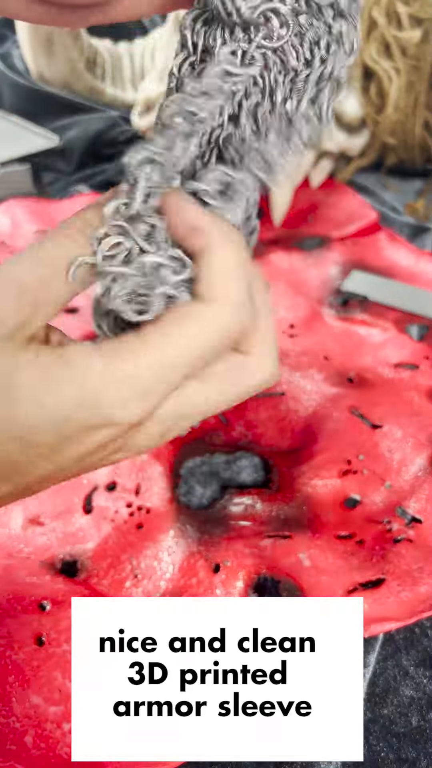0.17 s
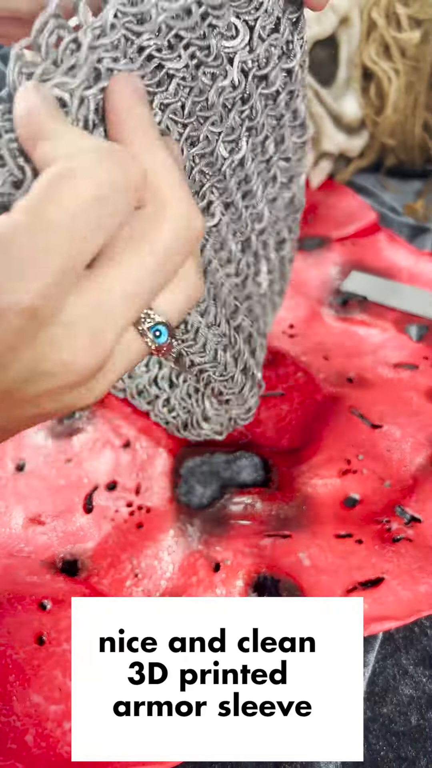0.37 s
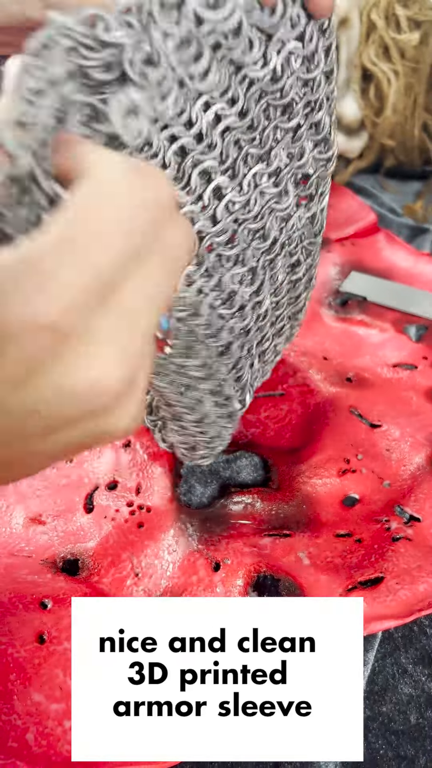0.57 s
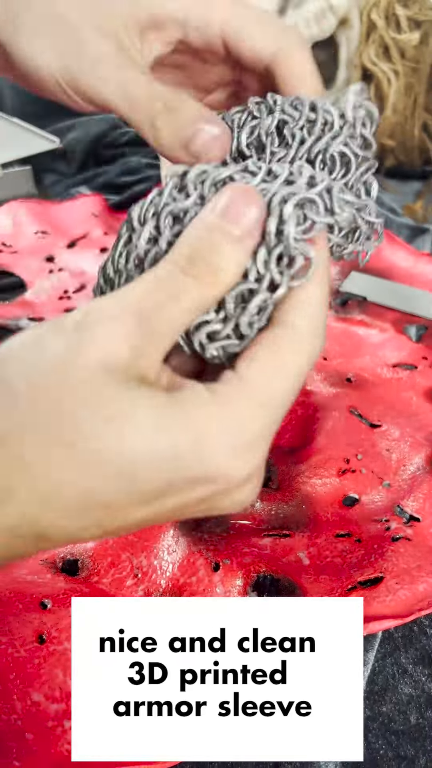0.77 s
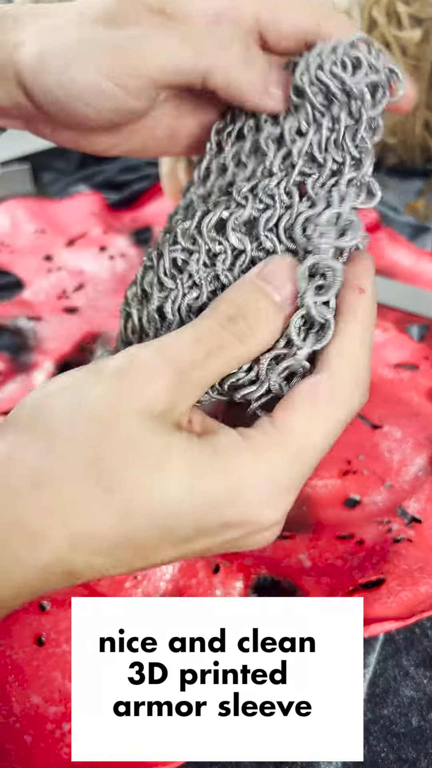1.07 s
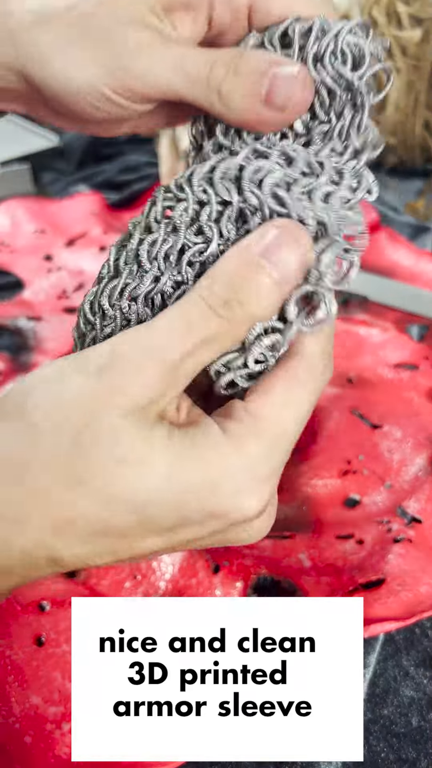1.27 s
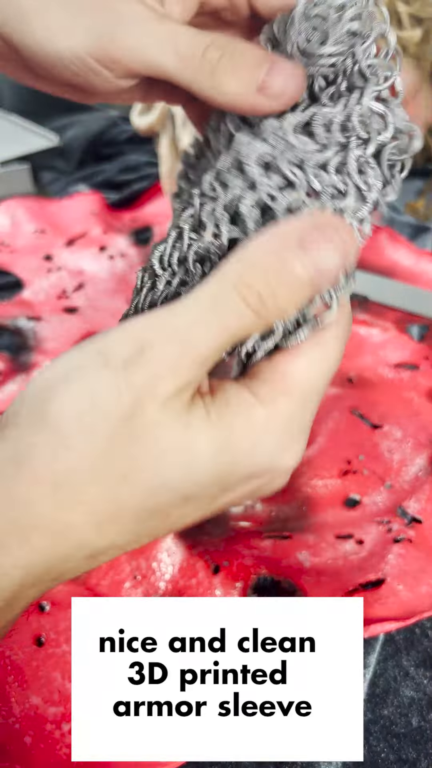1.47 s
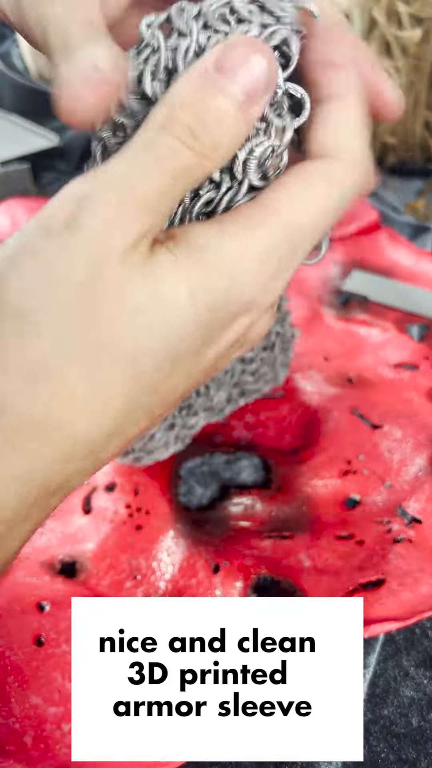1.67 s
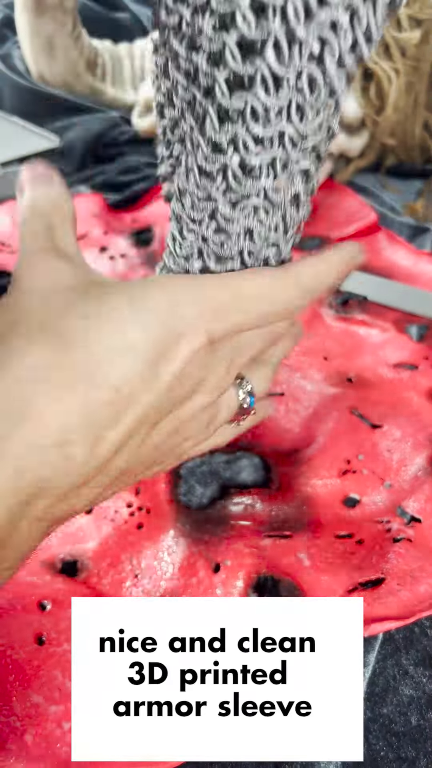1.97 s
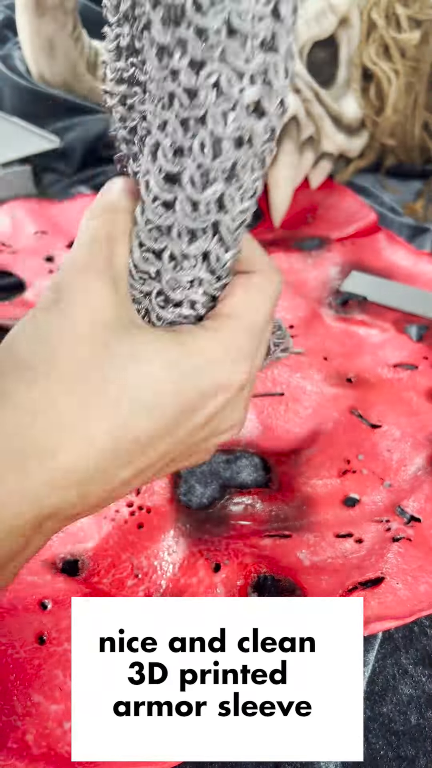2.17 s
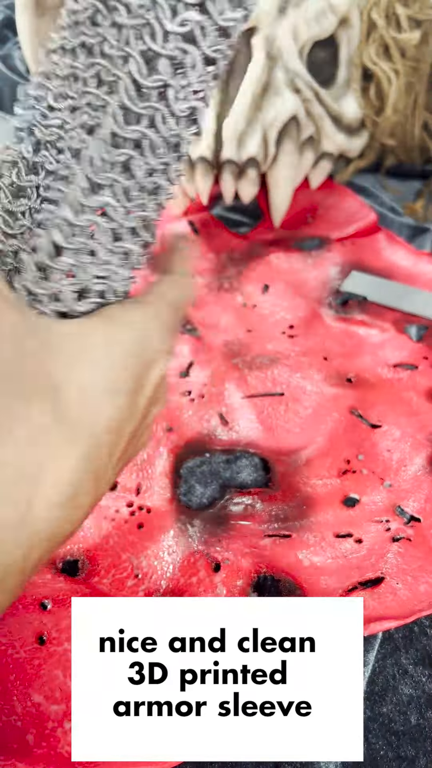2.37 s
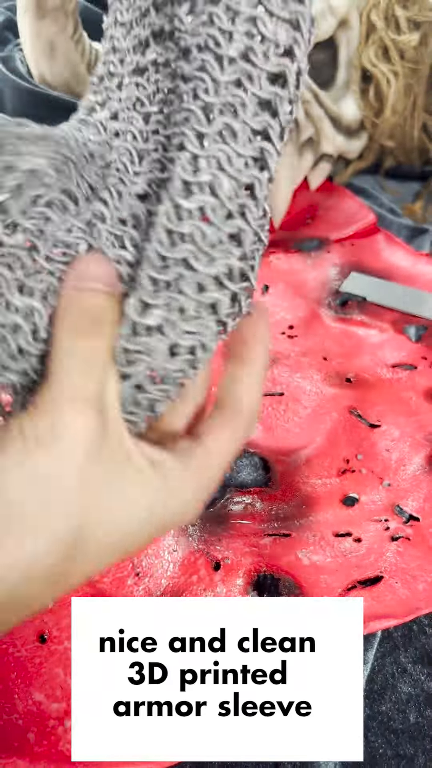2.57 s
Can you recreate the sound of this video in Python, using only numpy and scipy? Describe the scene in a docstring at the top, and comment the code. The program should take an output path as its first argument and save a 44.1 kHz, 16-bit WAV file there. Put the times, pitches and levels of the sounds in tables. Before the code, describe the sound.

A chainmail sleeve of hard plastic links is handled close to the microphone in a small room: bright dense rustling, lower hollow clatter, dry snaps, the sharpest midway, then two crunches, over faint hum.

```python
"""A sleeve of hard plastic chain links is squeezed and turned by hand, close up in a small room.
From the start, still air and a machine's hum (filtered noise and wavering sines) lie under a bright rustle
of tiny ringing contacts, while bunches of links clatter lower down and ring short hollow knocks.
Loose links soon snap as dry noise bursts; fistfuls are crushed at about 0.5 and 0.8 s, the hardest snap
comes near 1.26 s, and two closer crunches follow just after 2 s."""
import sys
import numpy as np
from scipy import signal
from scipy.fft import rfft, irfft
from scipy.io import wavfile
from scipy.ndimage import uniform_filter1d

SR = 44100
rng = np.random.default_rng(int(sys.argv[2]) if len(sys.argv) > 2 else 0)


def store_pcm(level_fs):
    """Save levels as 16-bit WAV."""
    pcm = np.round(np.clip(level_fs, -1, 1) * 32767).astype(np.int16)
    wavfile.write(sys.argv[1], SR, np.atleast_2d(pcm).T)


def gain_from_db(level_db):
    """Convert decibel levels to linear amplitude factors (20 dB per decade)."""
    decades = np.asarray(level_db, float) / 20
    return 10 ** decades


N = 119952  # 2.72 s


def evened(x):
    """Scales to rms 1."""
    return x / np.sqrt(np.mean(x ** 2) + 1e-20)


def read(points, at, axis=1):
    """Reads one table column along straight lines between its points."""
    table = np.array(points, float)
    return np.interp(at, table[:, 0], table[:, axis])


def coloured(x, points):
    """Filters by a spectrum whose points are joined on a log-frequency axis."""
    hz, db = np.transpose(points)
    log_hz = np.log(np.fft.rfftfreq(N, 1 / SR) + 1)
    return irfft(rfft(x) * gain_from_db(np.interp(log_hz, np.log(hz), db)), N)


def low_part(x, split_hz):
    """The part of a sound below a split, without phase shift."""
    return signal.sosfiltfilt(signal.butter(2, split_hz, fs=SR, output="sos"), x)


def wander(per_s):
    """Slow random drift of rms 1: noise averaged twice over 1/per_s seconds."""
    size = max(int(SR / per_s), 2)
    smooth = uniform_filter1d(rng.standard_normal(N), size)
    return evened(uniform_filter1d(smooth, size))


def add(mix, s, sound):
    """Places a sound at a time."""
    part = mix[round(s * SR):][:len(sound)]
    part += sound[:len(part)]


# colour of the still room air: (f/Hz, relative level/dB)
AIR_COLOUR = [(20, -35), (32, -37), (48, 2.5), (85, -3), (125, -2), (165, -4.5), (225, -1), (330, -6.5),
              (500, -9.5), (900, -17.5), (1400, -25), (2300, -25.5), (4500, -15.5), (7000, -20.5),
              (10000, -13.5), (16000, -31.5)]


def room_air():
    """Still air as steady noise, heaviest in the lows."""
    return gain_from_db(-48) * evened(coloured(rng.standard_normal(N), AIR_COLOUR))


# steady tones of the machine, before the port balance: (f/Hz, level/dB rms, waver/dB rms)
HUM_TONES = [(99.5, -55, 0.5), (120.2, -50, 0.56), (296.7, -66, 1), (383.5, -69, 4)]
# one hum tone that swells, fades and drifts, before the port balance: (t/s, f/Hz, level/dB rms)
SWELLING_TONE = [(0.0, 191.7, -43), (0.07, 196.6, -60.5), (0.16, 193.5, -46), (0.34, 190.3, -51),
                 (0.75, 190.7, -45.5), (1.02, 190.9, -56), (1.52, 190.6, -50.5), (1.53, 189.9, -47.5),
                 (2.33, 191.3, -56.5), (2.39, 190.4, -48.5), (2.45, 189.7, -68), (2.46, 190.3, -58),
                 (2.48, 190.6, -50), (2.72, 193, -50)]


def hum():
    """Machine hum: sines of wavering level, plus one whose pitch and level follow a table."""
    t = np.arange(N) / SR
    phase = 2 * np.pi * np.cumsum(read(SWELLING_TONE, t)) / SR
    out = np.sqrt(2) * gain_from_db(read(SWELLING_TONE, t, axis=2)) * np.sin(phase)
    for hz, db, waver_db in HUM_TONES:
        level = np.sqrt(2) * gain_from_db(db + waver_db * wander(9.1))
        out += level * np.sin(2 * np.pi * (hz * t + rng.random()))
    return out


# how alike the two microphone ports hear: (f/Hz, likeness/0-1, lead of the right port/rad)
PORT_LIKENESS = [(30, 1, 0), (70, .99, 0), (140, .85, 0), (250, .9, .1), (400, .5, .4), (600, .3, 2.5),
                 (850, .2, 0), (1200, .5, 0), (1650, .985, 0), (2150, .985, 0), (2500, .7, .4),
                 (3100, .2, .5), (3750, .96, .1), (4250, .96, .1), (4600, .7, .7), (4950, .93, 2.9),
                 (5150, .93, 3.5), (5450, .97, 6.1), (5700, .995, 6.28), (7200, .995, 6.3), (7500, .9, 6.8),
                 (8300, .9, 7.2), (9600, .92, 7.5), (11700, .93, 8.6), (13000, .97, 9.2),
                 (13500, .997, 9.42), (16000, .995, 9.45)]


def ports(x, other):
    """The right port hears part of the left sound, phase-turned, and part of a separate, similar sound."""
    hz = np.fft.rfftfreq(N, 1 / SR)
    same = np.clip(read(PORT_LIKENESS, hz), 0, 1)
    shared = same * np.exp(1j * read(PORT_LIKENESS, hz, axis=2)) * rfft(x)
    separate = np.sqrt(1 - same ** 2) * rfft(other)
    return np.array([x, irfft(shared + separate, N)])


def echoes(x, t60, start_s):
    """Room tail: a decaying noise spray of reflections, energy 1."""
    t = np.arange(SR // 4) / SR
    tail = rng.standard_normal(len(t)) * gain_from_db(-60 * t / t60) * (t >= start_s)
    return signal.oaconvolve(x, tail / np.linalg.norm(tail))[:N]


KNOCK_T60_S, KNOCK_TRIM_DB = .016, 1
# single hollow knocks of a bunch: (t/s, level/dB before trim, f/Hz of the ring)
KNOCKS = [(0.0357, -38, 2330), (0.5931, -39, 2330), (0.6464, -34, 2130), (0.9834, -33.5, 2260),
          (1.5222, -41, 2300), (1.7467, -34, 2620), (1.8835, -34, 2835), (1.9789, -29, 2520),
          (2.1164, -36, 2200)]


def knocks():
    """Each knock rings one short hollow note, a sine dying exponentially."""
    out, t = np.zeros(N), np.arange(1200) / SR
    for s, db, hz in KNOCKS:
        fade = gain_from_db(db + KNOCK_TRIM_DB - 60 * t / KNOCK_T60_S)
        add(out, s, fade * np.sin(2 * np.pi * hz * t))
    return out


SNAP_RISE_S, SNAP_FADE_S, SNAP_TRIM_DB, SNAP_SPLIT_HZ = .001, .0022, 4, 3400
# colour of a snap: (f/Hz, relative level/dB)
SNAP_COLOUR = [(1000, -14), (2000, -23), (3000, -20), (4200, -8), (5500, -11.5), (7600, -0.5), (9500, -10),
               (12000, 3.5), (15500, -3)]
# single links snapping past each other: (t/s, level/dB before trim, extra level/dB below the split)
SNAPS = [(0.0684, -31, -5), (0.294, -31, 9), (0.4694, -40, -2), (0.5195, -21, -4), (0.875, -23.5, 0),
         (1.1577, -24, -1), (1.259, -13, -1.5), (1.294, -21.5, 4.5), (1.3474, -22, 5), (1.3529, -30, 0),
         (1.3986, -35, -8), (1.6548, -36, -11), (1.942, -34, 3)]


def snaps():
    """Each snap is a dry noise burst of a few milliseconds, with its own share of dull and bright."""
    out, t = np.zeros(N), np.arange(800) / SR
    burst = evened(coloured(rng.standard_normal(N), SNAP_COLOUR))
    dull = low_part(burst, SNAP_SPLIT_HZ)
    envelope = (1 - np.exp(-(t / SNAP_RISE_S) ** 2)) * np.exp(-t / SNAP_FADE_S)
    for s, db, dull_db in SNAPS:
        body = (burst + (gain_from_db(dull_db) - 1) * dull)[round(s * SR):][:len(t)]
        add(out, s, gain_from_db(db + SNAP_TRIM_DB) * envelope * body)
    return out


def contacts(per_s, cycles, spread_db, clump_db, lo_hz, hi_hz, count=24):
    """Random contacts, each ringing a few cycles at one of many pitches, coming in clumps."""
    out, t = np.zeros(N), np.arange(400) / SR
    for hz in np.geomspace(lo_hz, hi_hz, count):
        strength_db = spread_db * np.minimum(rng.exponential(1, N), 5)
        hits = (rng.random(N) < per_s / count / SR) * gain_from_db(strength_db)
        signs = rng.choice([-1., 1.], N)
        ring = np.sin(2 * np.pi * hz * t) * np.exp(-t * hz / cycles * 2)
        ring *= hz / np.linalg.norm(ring)
        out += signal.oaconvolve(hits * signs, ring)[:N] / np.sqrt(hz)
    return out * gain_from_db(clump_db * (wander(113) + wander(20)))


CLATTER_TRIM_DB = 2
# colour of the bumping bunches: (f/Hz, relative level/dB)
BUNCH_COLOUR = [(400, -16.5), (900, -10.5), (1500, -7), (2400, -1.5), (3200, -3), (4500, -6.5),
                (7000, -11.5), (12000, -24)]
# how hard bunches of links bump: (t/s, level/dB before trim)
BUMP = [(0.0, -51), (0.03, -54), (0.04, -53), (0.07, -58.5), (0.26, -51), (0.39, -60.5), (0.45, -50),
        (0.57, -58.5), (0.6, -49.5), (0.76, -45.5), (0.79, -52), (0.95, -49.5), (0.98, -42), (1.04, -48.5),
        (1.37, -54), (1.38, -58.5), (1.48, -49.5), (1.49, -61), (1.52, -50), (1.65, -58), (1.74, -45.5),
        (1.8, -50.5), (1.97, -45), (1.98, -41.5), (1.99, -40), (2.12, -42.5), (2.14, -56), (2.34, -62),
        (2.58, -52), (2.72, -61)]


def clatter():
    """Bunches of links bumping: fewer contacts than the rustle, lower and hollower."""
    grains = contacts(4000, cycles=4.25, spread_db=2, clump_db=1.3, lo_hz=693, hi_hz=7150)
    bunches = evened(coloured(grains, BUNCH_COLOUR))
    return bunches * gain_from_db(CLATTER_TRIM_DB + read(BUMP, np.arange(N) / SR))


RUSTLE_TRIM_DB = 5.5
LET_GO_S, CRUSH_DULL, CRUSH_SPLIT_HZ = .004, 0.73, 8500  # crushing adds a share more dB below the split
# colour of the link contacts: (f/Hz, relative level/dB)
LINK_COLOUR = [(1500, -23.5), (2500, -18), (4000, -16), (5300, -10.5), (6500, -7.5), (7300, -7),
               (8300, -0.5), (9500, 1.5), (10400, -4), (11800, 1), (13500, -1), (15500, -5), (18000, -12.5)]
# how hard the links slide: (t/s, level/dB before trim and crush)
SLIDE = sum([ [(0.0, -34), (0.054, -40.5), (0.188, -36.5), (0.338, -45), (0.376, -44.5), (0.386, -49),
         (0.504, -51.5), (0.52, -36), (0.596, -43), (0.71, -35.5), (0.766, -41), (0.834, -48), (0.856, -43),
         (0.99, -40), (1.088, -43.5), (1.1, -48), (1.122, -40.5), (1.164, -39.5), (1.24, -44)],
         [(1.37, -46.5), (1.378, -49.5), (1.432, -52.5), (1.442, -39), (1.466, -34.5), (1.502, -38),
         (1.554, -37), (1.612, -40.5), (1.624, -48), (1.646, -51), (1.654, -40), (1.706, -35), (1.832, -36),
         (1.852, -42.5), (1.916, -44), (1.92, -49), (1.948, -48.5), (1.98, -40), (2.03, -39.5)],
         [(2.125, -38), (2.169, -40), (2.177, -39), (2.263, -38.5), (2.311, -41), (2.351, -37),
         (2.417, -40.5), (2.457, -35.5), (2.611, -37), (2.643, -49), (2.681, -41), (2.687, -43),
         (2.72, -39)], ], [])
# a fistful of links crushed, building up then let go: (t/s of the end, build-up/s, extra level/dB)
CRUNCHES = [(.538, 0.013, 2.5), (.766, .012, 5), (2.066, 0.026, 7.5), (2.106, 0.027, 5.5)]


def rustle():
    """Fine links sliding over each other: dense bright contacts, louder and duller when crushed."""
    t = np.arange(N) / SR
    crush_db = np.zeros(N)
    for end, build, db in CRUNCHES:
        crush_db += np.interp(t, [end - build, end, end + LET_GO_S], [0, db, 0])
    grains = contacts(18000, cycles=4.8, spread_db=2, clump_db=1.0, lo_hz=3000, hi_hz=18000)
    links = evened(coloured(grains, LINK_COLOUR))
    dull_boost = (gain_from_db(CRUSH_DULL * crush_db) - 1) * low_part(links, CRUSH_SPLIT_HZ)
    return (links + dull_boost) * gain_from_db(RUSTLE_TRIM_DB + read(SLIDE, t) + crush_db)


def sleeve():
    """All sounds of the links, with the room tail."""
    links = rustle() + clatter() + snaps() + knocks()
    return links + gain_from_db(-9) * echoes(links, t60=0.13, start_s=0.0031)


def scene():
    """The sleeve heard at the two ports, partly alike, over air and hum."""
    balance = gain_from_db(np.array([[-.5], [.5]]) * 2.16)  # dB by which the background is louder at the right
    background = (ports(room_air(), room_air()) + hum()) * balance
    return ports(sleeve(), sleeve()) + background


def roll_off(x):
    """The treble ends steeply here."""
    return signal.sosfilt(signal.butter(12, 17160, fs=SR, output="sos"), x)


def record(dry):
    """Limits the band with a steep linear-phase low-pass and finishes the mix."""
    edge = signal.firwin(511, 15700, window=("kaiser", 9), fs=SR)
    mix = signal.oaconvolve(dry, edge[None], "same")
    return roll_off(mix)


dry = scene()
out = record(dry)
store_pcm(out)
```